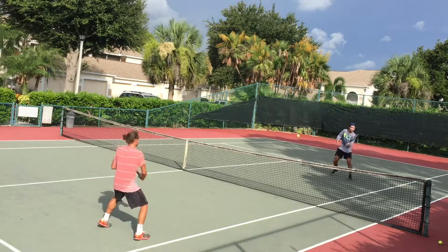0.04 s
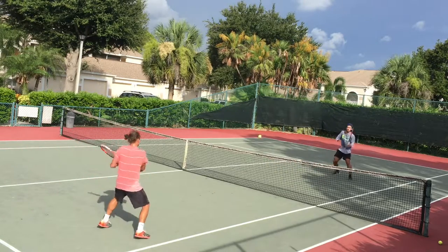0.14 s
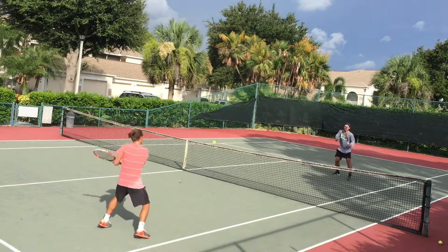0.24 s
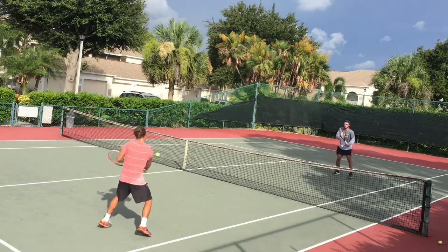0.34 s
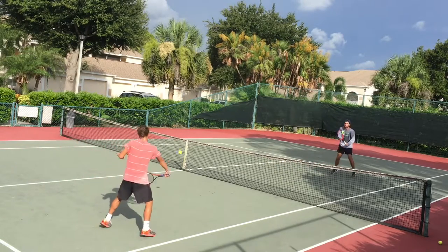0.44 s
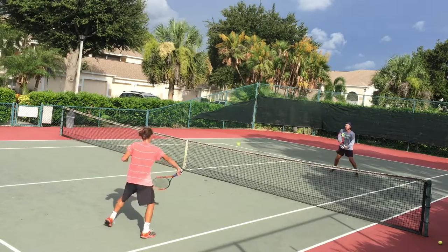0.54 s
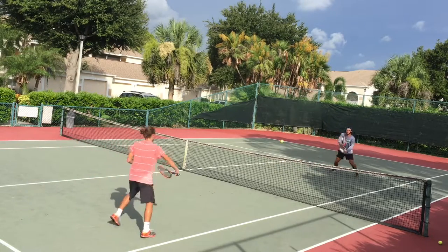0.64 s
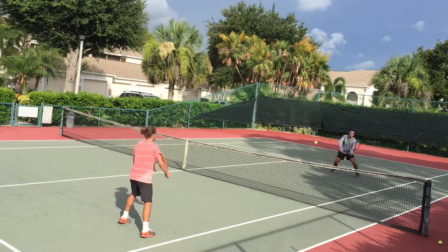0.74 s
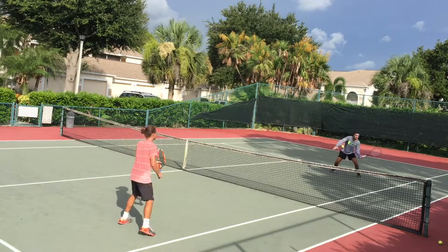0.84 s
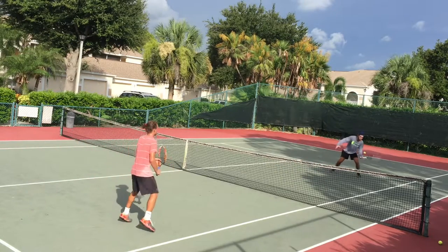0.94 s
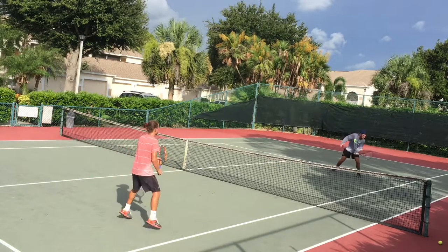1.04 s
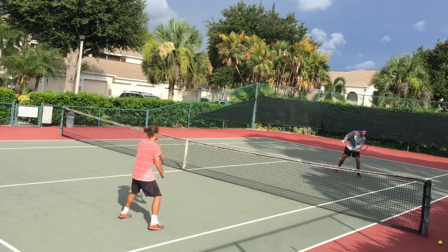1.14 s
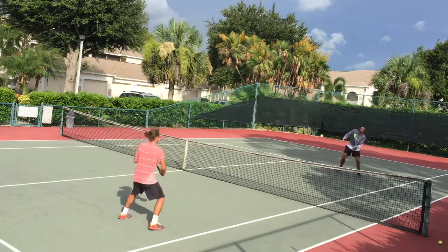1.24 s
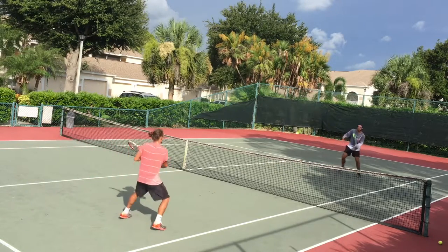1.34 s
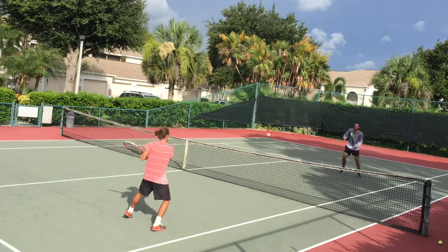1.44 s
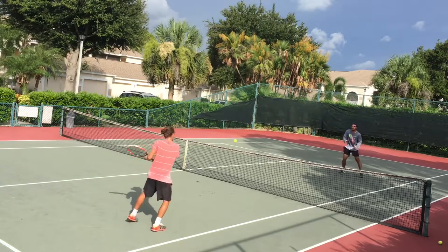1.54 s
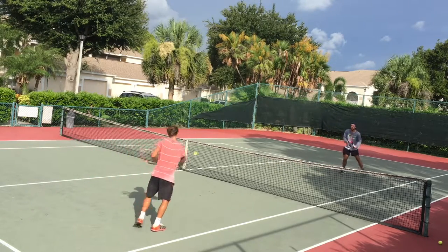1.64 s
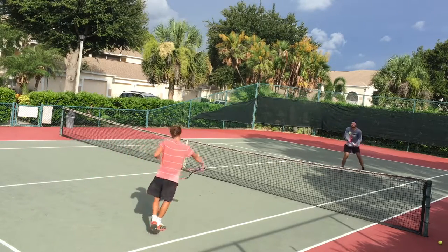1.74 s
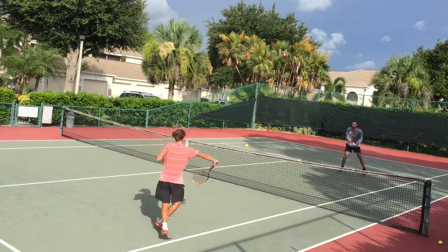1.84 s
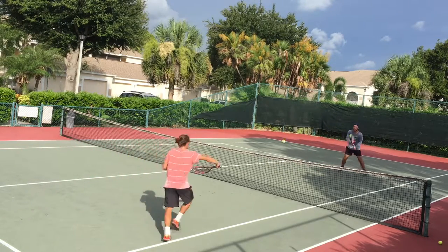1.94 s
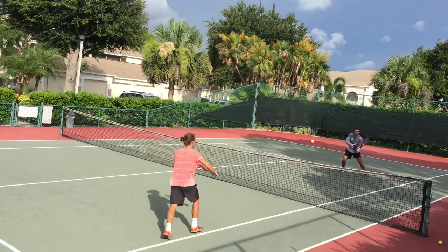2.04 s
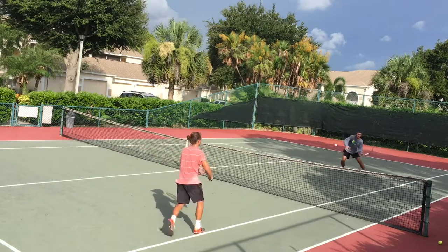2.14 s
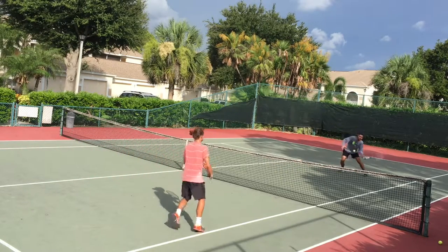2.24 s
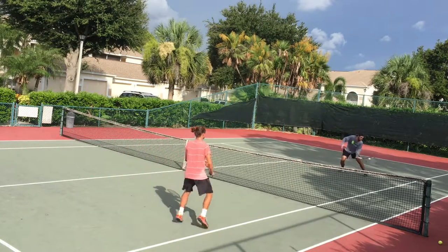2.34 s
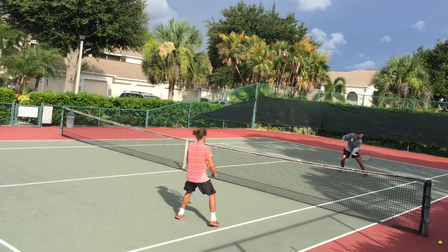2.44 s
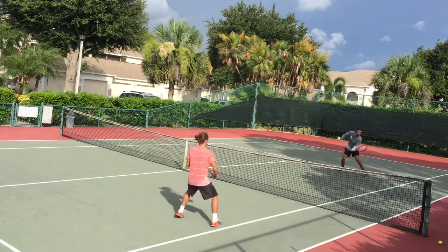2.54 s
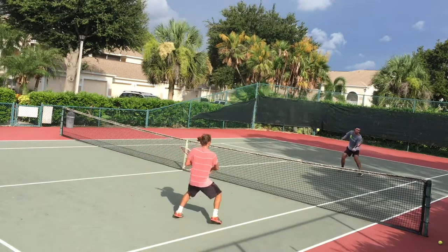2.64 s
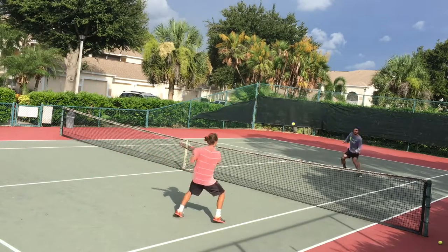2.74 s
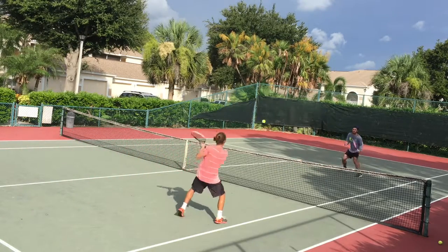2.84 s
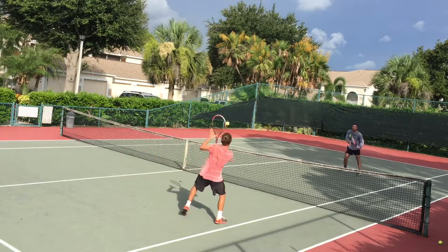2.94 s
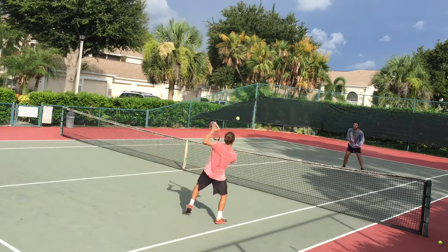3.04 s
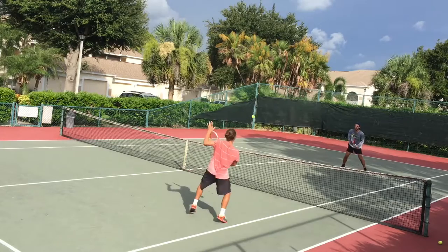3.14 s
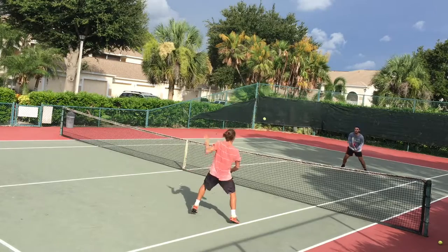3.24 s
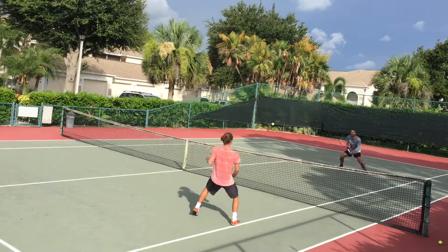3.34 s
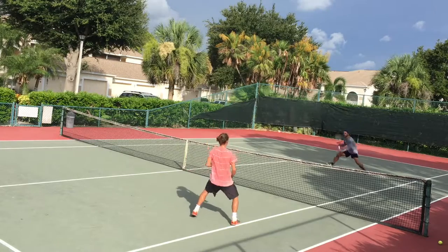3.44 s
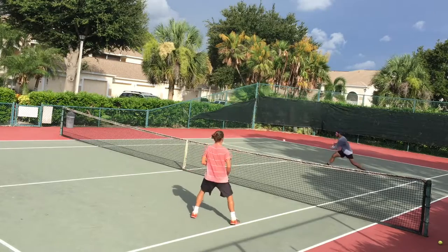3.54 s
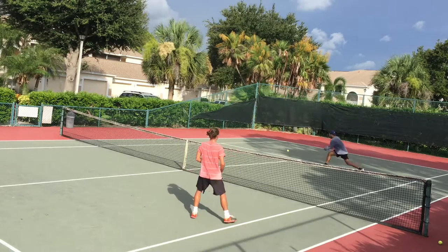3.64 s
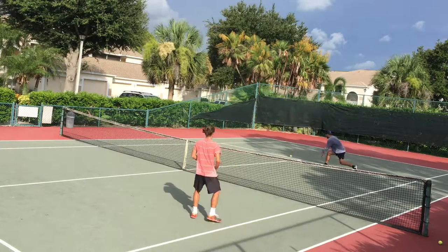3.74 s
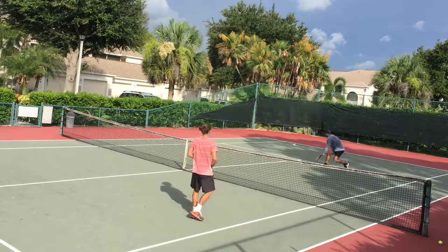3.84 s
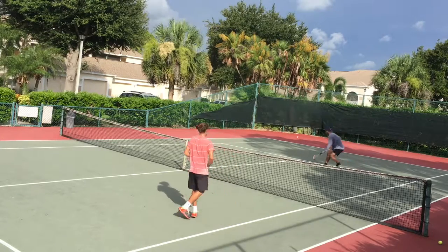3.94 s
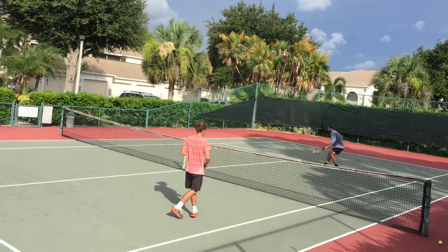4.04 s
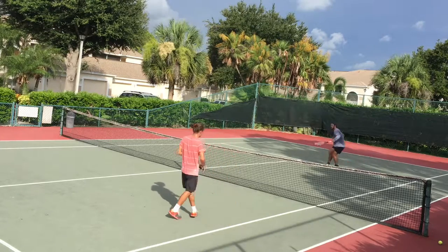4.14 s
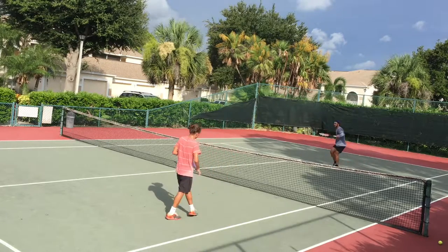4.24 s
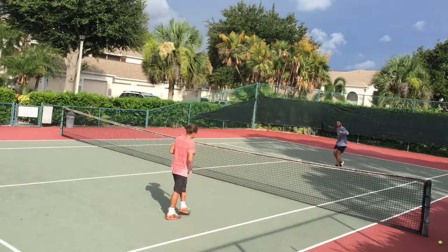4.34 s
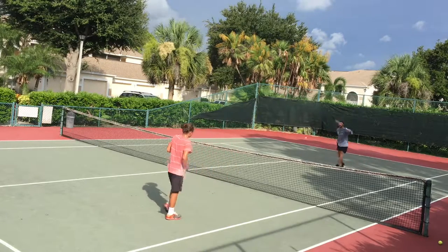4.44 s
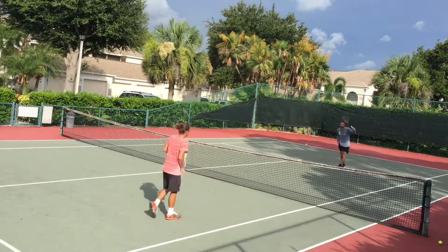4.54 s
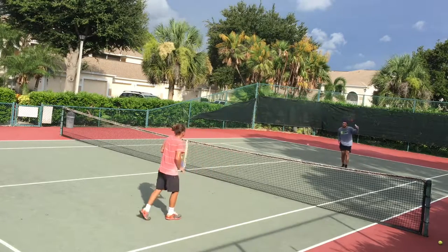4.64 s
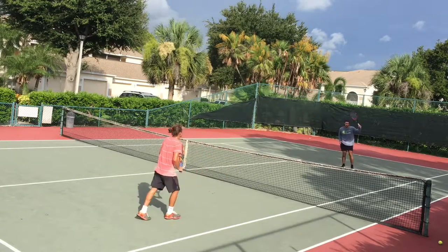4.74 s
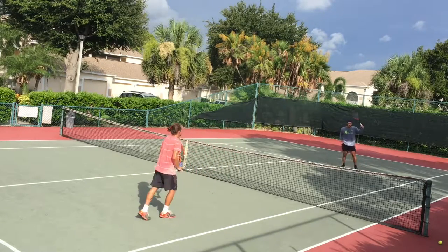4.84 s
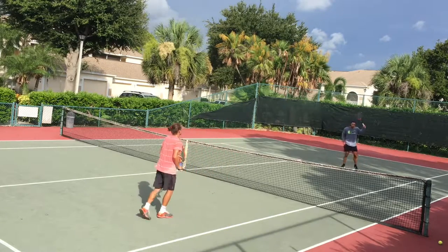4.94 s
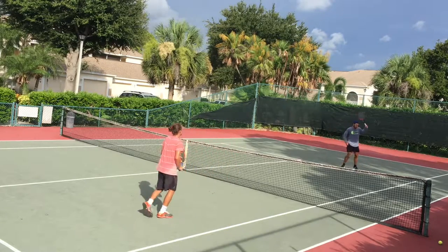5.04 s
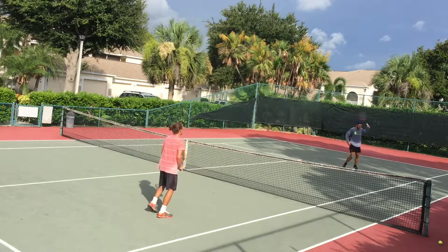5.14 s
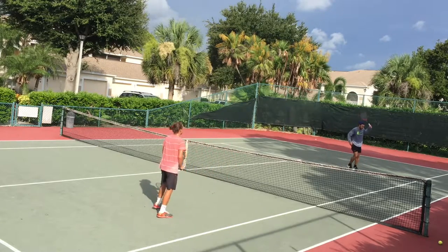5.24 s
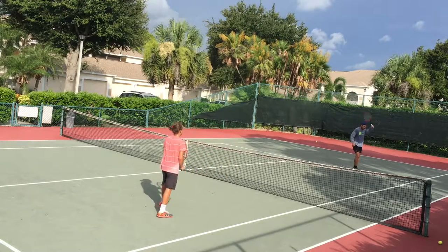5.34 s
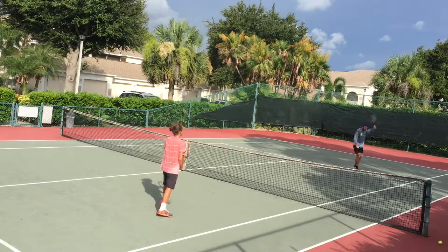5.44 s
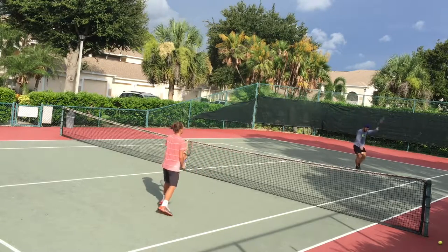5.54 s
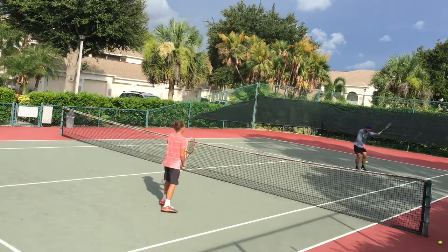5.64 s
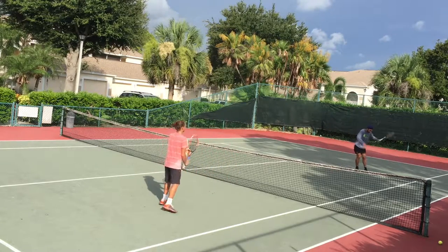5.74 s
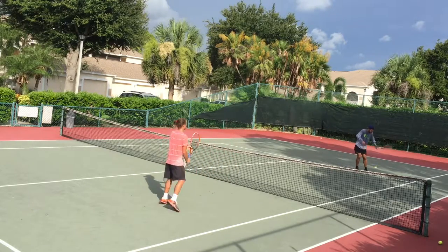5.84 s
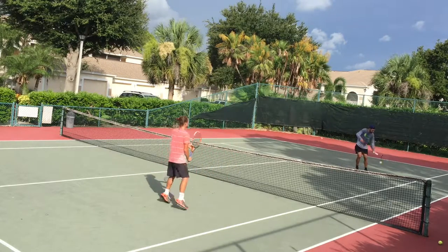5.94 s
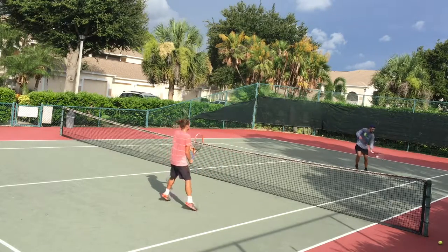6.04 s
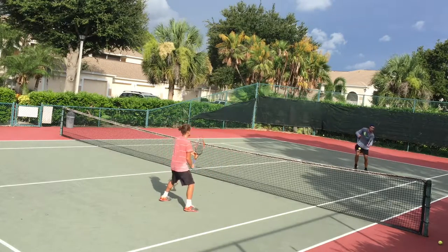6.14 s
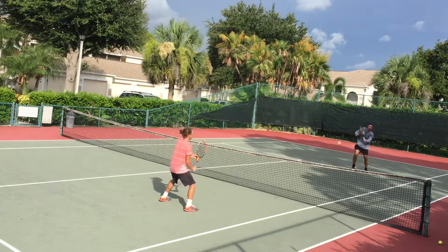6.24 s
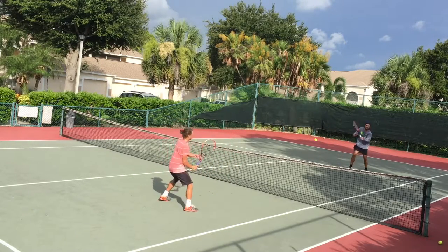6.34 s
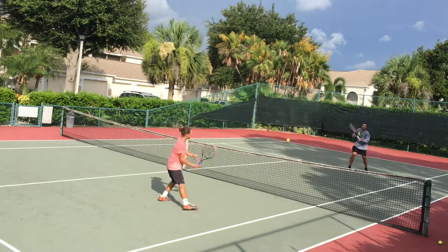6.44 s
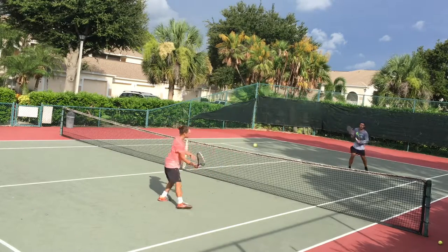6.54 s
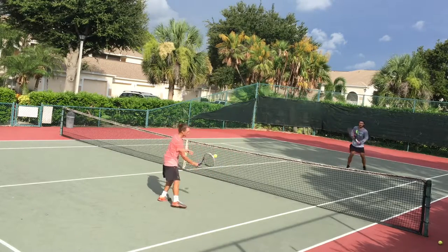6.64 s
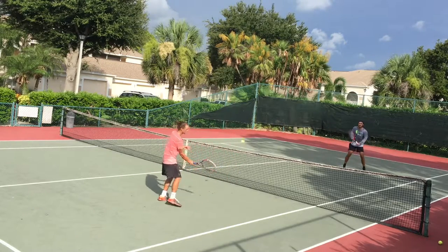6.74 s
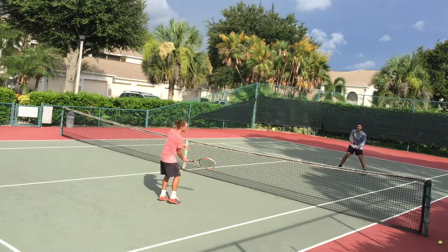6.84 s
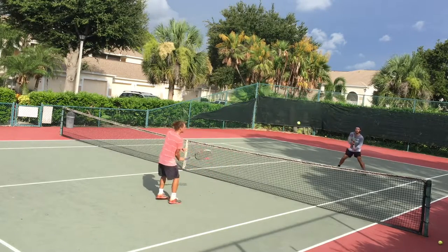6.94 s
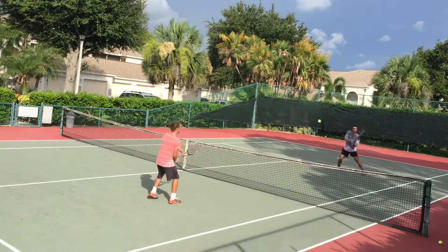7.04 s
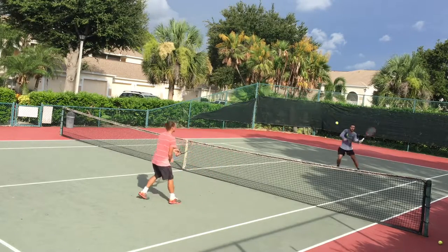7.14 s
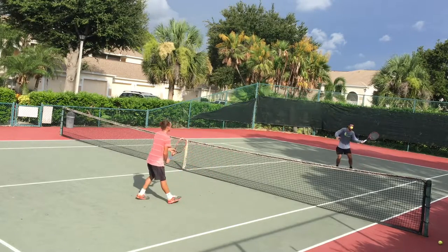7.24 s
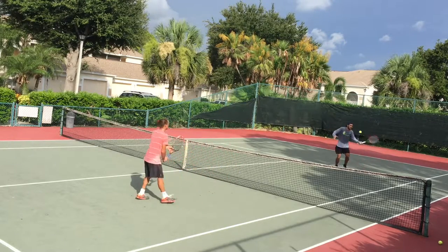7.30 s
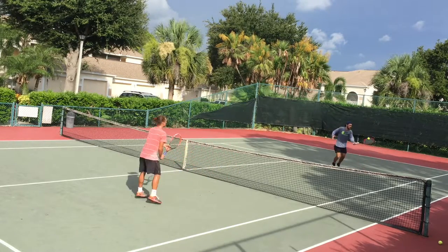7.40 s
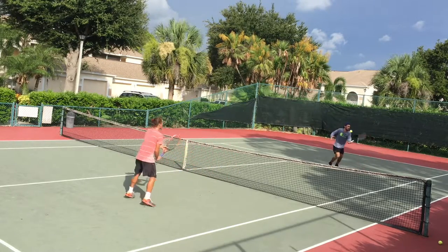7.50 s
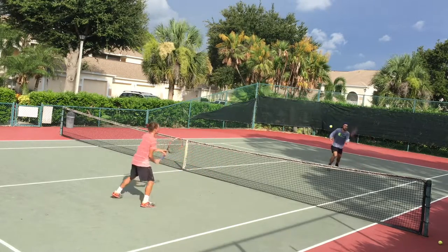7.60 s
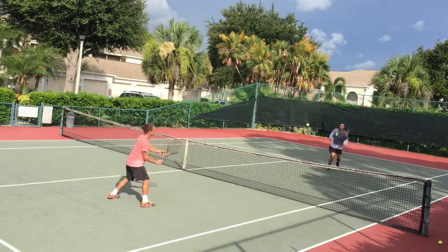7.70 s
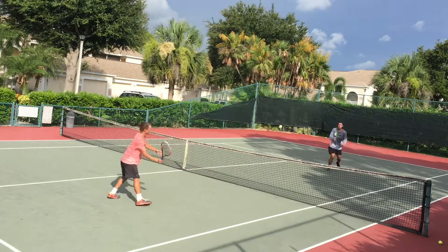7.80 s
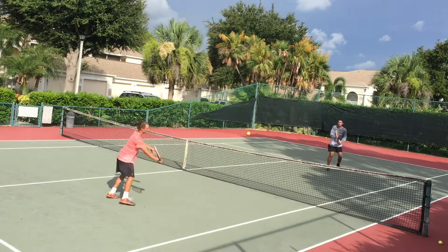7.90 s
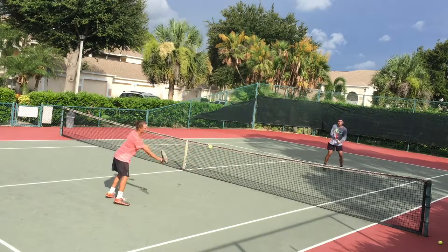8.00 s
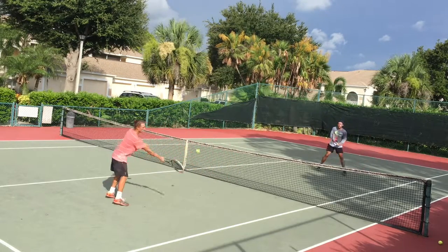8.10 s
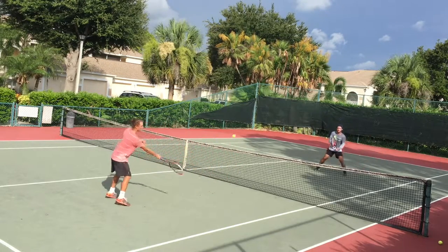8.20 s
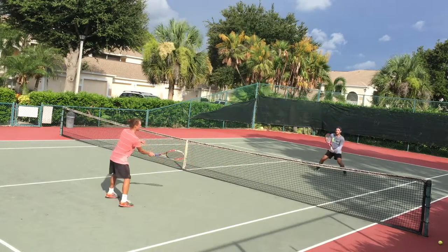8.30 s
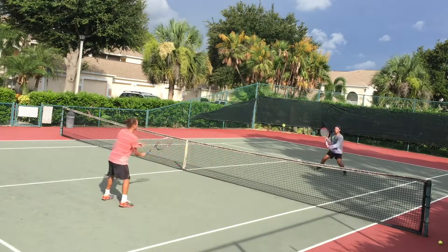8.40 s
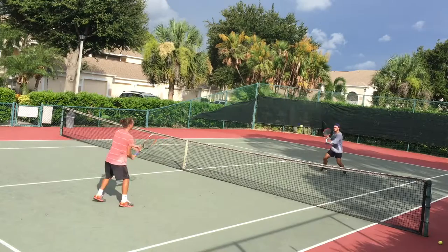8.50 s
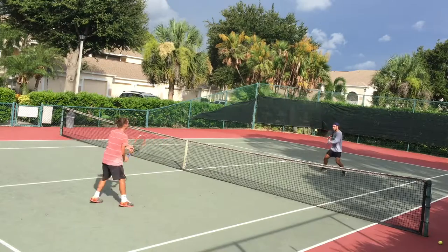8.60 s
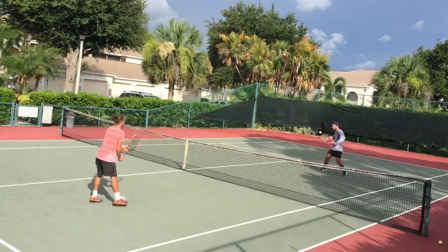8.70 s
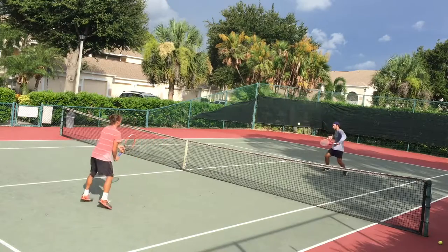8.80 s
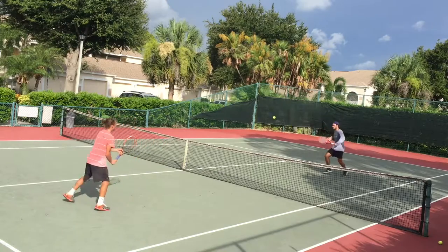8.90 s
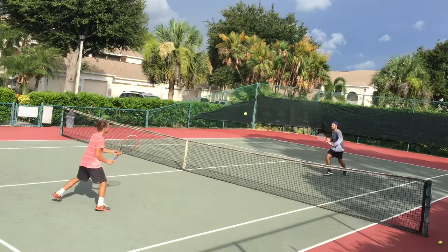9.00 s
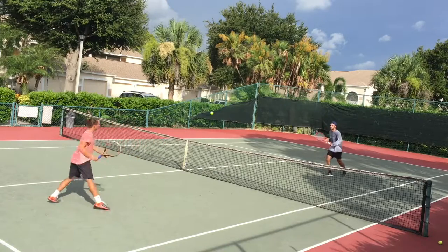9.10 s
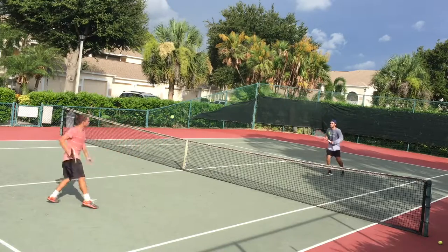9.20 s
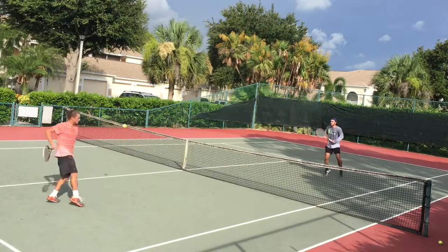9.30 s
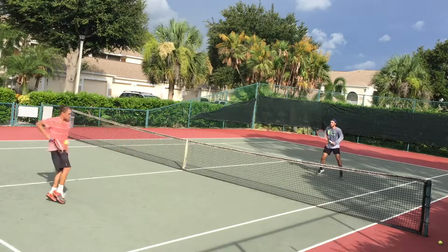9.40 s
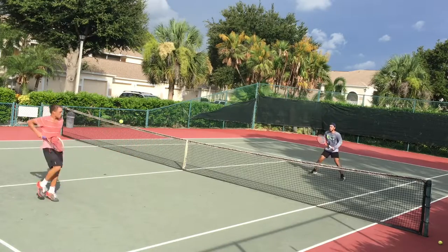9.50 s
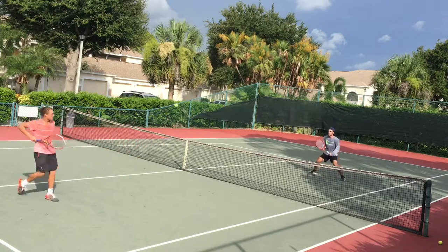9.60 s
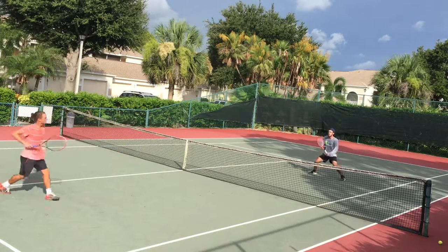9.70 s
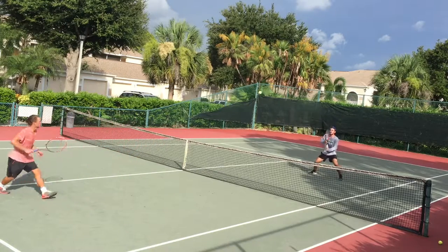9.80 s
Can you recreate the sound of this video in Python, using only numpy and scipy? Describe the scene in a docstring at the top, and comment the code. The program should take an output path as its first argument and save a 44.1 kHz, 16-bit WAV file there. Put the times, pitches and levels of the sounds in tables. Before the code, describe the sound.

A quick tennis rally outdoors, with sharp hollow racket hits, scraping and squeaking shoes and a few ball bounces.

```python
"""Rubber soles scuff and squeak over an outdoor hush: two players volley at the net of a hard tennis court.
Each stroke is a crack of strings, a push of air and the short ring of the hollow ball, doubled by the ground.
Soles rasp on grit, squeak in stick-slip and land with a dull pat; a few times the ball bounces.
Fences and houses answer faintly; distant traffic, trees and a machine hum lie underneath."""
import sys
import numpy as np
from scipy import signal
from scipy.fft import rfft, irfft, next_fast_len
from scipy.io import wavfile

SR = 44100
rng = np.random.default_rng(int(sys.argv[2]) if len(sys.argv) > 2 else 0)


def wav_out(sig):
    """Save sig, one row per channel (or a flat mono array), as 16-bit PCM at SR to the path in sys.argv[1]."""
    wavfile.write(sys.argv[1], SR, np.round(np.clip(np.atleast_2d(sig).T, -1, 1) * 32767).astype(np.int16))


N = 434826


def amp(db):
    """Decibels to gain."""
    return 10 ** (np.asarray(db) / 20)


def unit_rms(x):
    """Scales to rms 1."""
    return x / np.sqrt(np.mean(x ** 2) + 1e-20)


def curve_at(points, hz):
    """Interpolates a table on a log-frequency axis."""
    f, value = np.transpose(points)
    return np.interp(np.log(hz + 1), np.log(f + 1), value)


def add(mix, start_s, sound):
    """Mixes a sound in at start_s."""
    part = mix[max(round(start_s * SR), 0):][:len(sound)]
    part += sound[:len(part)]


def play(table, source):
    """Sounds each row of an event table at its start time."""
    track = np.zeros(N)
    for start_s, *row in table:
        add(track, start_s, source(*row))
    return track


def noise(count, gain):
    """Noise of rms 1, spectrum shaped by gain(Hz)."""
    size = next_fast_len(count + 512)
    hz = np.fft.rfftfreq(size, 1 / SR) + 1
    return unit_rms(irfft(rfft(rng.standard_normal(size)) * gain(hz), size)[:count])


def ring(t, hz, rise_s, decay_s):
    """Damped sine, soft onset at t = 0, envelope peak 1."""
    t = np.maximum(t, 0)
    envelope = (1 - np.exp(-(t / rise_s) ** 2)) * np.exp(-t / decay_s)
    return envelope / envelope.max() * np.sin(2 * np.pi * hz * t)


def resonate(x, hz, width_hz):
    """Moving resonance: shifts the curve hz to zero, smooths twice, shifts back."""
    carrier = np.exp(2j * np.pi * np.cumsum(hz) / SR)
    r = np.exp(-np.pi * width_hz / SR)
    return 2 * (carrier * signal.lfilter([(1 - r) ** 2], [1, -2 * r, r * r], x / carrier)).real


def hush(air_db=-63, hum_db=-72, hum_hz=238, hum_half_width_hz=2.8):
    """Distant traffic and air in the trees, a wavering rumble, and the hum of a far machine."""
    # Air spectrum. Each row: frequency in Hz, relative density in dB.
    spectrum = [(15, -42), (25, -16.5), (58, -2.5), (120, -9.5), (145, -12.5), (180, -9), (206, -17.5),
                (242, -11), (326, -21), (531, -24), (754, -25.5), (1480, -24.5), (1790, -27.5), (7710, -35),
                (16000, -42.5)]
    air = noise(N, lambda hz: amp(curve_at(spectrum, hz)))
    rumble = signal.sosfilt(signal.butter(1, 300, fs=SR, output="sos"), air)
    drift = noise(N, lambda hz: 1 / (1 + (hz / 5) ** 4))
    hum = noise(N, lambda hz: 1 / (1 + ((hz - hum_hz) / hum_half_width_hz) ** 2))
    return amp(air_db) * (air + 0.12 * drift * rumble) + amp(hum_db) * hum


def scuff(load_s, unload_s, db, loaded_hz, rasp_db, tilt_db_per_oct, tread_sag=.13, catch_hz=60):
    """Tiny slips hiss over the grit and shake the tread, whose resonance rises under load."""
    # Rubber on grit. Each row: frequency in Hz, relative density in dB.
    grit_spectrum = [(260, -47), (450, -14), (580, -16.5), (1040, 0.5), (1420, -5.5), (1830, 1.5),
                     (2400, -6), (3490, 0), (4840, -4), (6630, -3.5), (7690, -9), (12000, -12),
                     (15100, -14), (16000, -23.5)]
    # A flatter sole sounds lower and hollower. Each row: tread pitch in Hz, body over grit in dB.
    hollowness = [(1800, -1.5), (2300, -21.5)]
    corners_s = np.cumsum([0, load_s, unload_s])
    t = np.arange(int(corners_s[-1] * SR) + 2) / SR
    n = len(t)
    pressure = np.sin(np.interp(t, corners_s, [0, np.pi / 2, 0])) ** np.where(t < load_s, 1, 2)
    grit = noise(n, lambda hz: amp(curve_at(grit_spectrum, hz)
                                   + tilt_db_per_oct * np.log2(np.maximum(hz, 1200) / 4000)))
    wander = noise(n, lambda hz: 1 / (1 + (hz / 110) ** 4))
    tread_hz = loaded_hz * (1 - tread_sag * (1 - pressure)) * (1 + 0.1 * wander)
    friction = noise(n, lambda hz: 1 / (1 + (900 / hz) ** 4))
    rasp = unit_rms(resonate(friction, tread_hz, width_hz=0.35 * loaded_hz))
    body = noise(n, lambda hz: 1 / (1 + (1.3 * (hz / 950 - 950 / hz)) ** 2))
    rub = unit_rms(grit + amp(rasp_db) * rasp + amp(curve_at(hollowness, loaded_hz)) * body)
    slip_db = 1.7 * noise(n, lambda hz: 1 / (1 + (hz / 650) ** 2))
    # the sliding sole catches and lets go
    catch_db = noise(n, lambda hz: 1 / (1 + (hz / catch_hz) ** 4 + (15 / hz) ** 4))
    return amp(db + catch_db) * pressure * unit_rms(amp(slip_db)) * rub


def squeak(length_s, db, hz, overtone_db, wander_depth=.036, fade_db_per_s=448.5):
    """Rubber sticks and slips thousands of times a second, unsteady in pitch and strength."""
    # A weak grip sags, a firm one climbs. Each row: level in dB, glide as a share of the pitch.
    glides = [(-38, -.18), (-22, .035)]
    progress = np.linspace(0, 1, int(length_s * SR))
    wander, flutter = (noise(len(progress), lambda hz: 1 / (1 + (hz / 600) ** 4)) for _ in range(2))
    glide = np.interp(db, *np.transpose(glides))
    pitch_hz = hz * (1 + glide * (progress - .5)) * (1 + wander_depth * (wander - wander.mean()))
    phase = 2 * np.pi * np.cumsum(pitch_hz) / SR
    third_db = min(overtone_db, -6) - 12.5
    tone = np.sin(phase) + amp(overtone_db) * np.sin(2 * phase) + amp(third_db) * np.sin(3 * phase)
    level_db = db - fade_db_per_s * length_s * progress + 2.2 * flutter
    return np.sqrt(2) * amp(level_db) * tone * signal.windows.tukey(len(tone), .3)


def footfall(db):
    """A sole lands: dull push, short pat."""
    t = np.arange(SR // 8) / SR
    pat = noise(len(t), lambda hz: 1 / (1 + (hz / 850) ** 4) / (1 + (200 / hz) ** 2)) * np.exp(-t / .007)
    push = ring(t, hz=210 * rng.uniform(0.38, 1.8), rise_s=0.00049, decay_s=.004)
    return amp(db - 3.5) * (push + 0.63 * pat)


def volley(lag_s, force_db, knock_db, ball_hz, ring_db, upper_db, firm_db=-18.5):
    """Felt slaps the strings, the ball flattens and pushes air, the frame knocks, the ball rings."""
    # String bed modes. Each row: nominal frequency in Hz, relative level in dB, t60 in seconds.
    string_modes = [(706, -6, .14), (1006.7, -7, .12), (1364, -6, .12), (1680, -8, 0.15), (1920, 1, 0.091),
                    (2100, -6, 0.15), (2530, -2, .08), (2635, -10, .07), (3515, -7, 0.071)]
    t = np.arange(SR // 4) / SR
    crack_db = force_db - 15.5 + .35 * min(force_db - firm_db, 0)  # soft strokes lose extra crack
    felt = noise(len(t), lambda hz: 1 / np.sqrt((1 + (1300 / hz) ** 4) * (1 + (hz / 3300) ** 4))
                 + amp(-37))
    contact = np.minimum(t / 0.0009, 1) * (np.exp(-(t / 0.0039) ** 2) + amp(-4.5) * np.exp(-t / 0.0092))
    crack = amp(crack_db) * felt * contact
    thump_t = t - .0052  # air is drawn in, then pushed out: no net flow
    thump = amp(force_db - 2) * np.sin(2 * np.pi * 185 * thump_t) * np.exp(-(thump_t / 0.0018) ** 2)
    knock = amp(force_db + knock_db + 7.5) * ring(t - .002, hz=418, rise_s=0.00065, decay_s=0.0011)
    ball = amp(ring_db - 0.5) * ring(t - .0042, ball_hz, rise_s=0.00057, decay_s=0.004)
    upper = amp(upper_db - 2) * ring(t - .0032, ball_hz * 1.42, rise_s=0.00023, decay_s=0.0027)
    tuning = rng.uniform(0.9, 1.01)
    spots_db = rng.uniform(-0.89, 7.6, len(string_modes))  # each impact spot favours other modes
    modes = sum(amp(db + spot_db - 60 * t / t60_s) * np.sin(2 * np.pi * (hz * tuning * t + rng.random()))
                for (hz, db, t60_s), spot_db in zip(string_modes, spots_db))
    strings = amp(crack_db - 7.5) * modes * np.minimum(t / 0.001, 1)
    low_cut = signal.butter(2, 95, "highpass", fs=SR, output="sos")  # a small body radiates little bass
    direct = signal.sosfilt(low_cut, crack + thump + knock + ball + upper + strings)
    return direct + 0.59 * np.interp(t - lag_s, t, direct, left=0)  # the court mirrors the stroke


def bounce(ring_db, ball_hz, thump_db):
    """The ball hits the hard court and rings at once, with a small thump."""
    t = np.arange(SR // 10) / SR
    shell = ring(t, ball_hz, rise_s=0.00032, decay_s=.002)
    upper = amp(-8.5) * ring(t, ball_hz * 1.75, rise_s=0.00035, decay_s=0.0015)
    thump = ring(t - .002, hz=196, rise_s=0.00098, decay_s=0.0021)
    return amp(ring_db) * (shell + upper) + amp(thump_db) * thump


def surroundings(x, taps_per_s=4000, tail_db=-21):
    """Thin scatter from trees and houses, soft echo clusters from the fences."""
    # Scatter decay. Each row: frequency in Hz, t60 in seconds.
    tail_t60 = [(150, 0.9), (1000, 0.5), (3000, 0.59), (6000, 0.43), (14000, 0.5)]
    # Scatter spectrum. Each row: frequency in Hz, relative level in dB.
    tail_colour = [(100, -9), (300, 0.5), (650, -6.5), (1020, 3.5), (1400, -1.5), (1800, -1), (2450, -3),
                   (3050, -1), (4500, 1), (6200, 2), (9000, 0), (15000, -10)]
    # Fence echoes. Each row: delay in seconds, relative level in dB, decay time in seconds.
    fence_echoes = [(.035, -29.5, .014), (.06, -27, 0.011), (0.089, -27, .014), (0.168, -33, 0.022)]
    taps = rng.standard_normal(SR) * (rng.random(SR) < taps_per_s / SR)
    hz, t, bins = signal.stft(taps, SR, nperseg=256)
    shape_db = curve_at(tail_colour, hz)[:, None] - 60 * t / curve_at(tail_t60, hz)[:, None]
    response = signal.istft(bins * amp(shape_db) * np.minimum(t / .008, 1), SR, nperseg=256)[1]
    response *= amp(tail_db) / np.linalg.norm(response)
    t = np.arange(SR // 10) / SR
    for delay_s, db, decay_s in fence_echoes:
        cluster = noise(len(t), lambda hz: 1 / np.sqrt(1 + (hz / 1250) ** 8 + (350 / hz) ** 4))
        cluster *= np.exp(-t / decay_s)
        add(response, delay_s, amp(db - 14.5) * cluster / np.linalg.norm(cluster))
    return signal.fftconvolve(x, response)[:N]


def scene(ball_send_db=1, shoe_send_db=-1):
    """Shoes and ball on the court, their echoes, and the hush; mono."""
    # Soles rubbing. Each row: start, loading and unloading in seconds, level in dB, loaded tread
    # pitch in Hz, rasp over grit in dB, grit tilt in dB per octave.
    scuffs = [(0.0, 0.0026, 0.057, -28, 2960, 5.5, 1), (.038, 0.016, 0.035, -32.5, 2650, 0.5, -3),
              (.468, .008, .02, -60, 2300, -5, 5), (.54, 0.01, .046, -37, 2850, -0.5, -1),
              (.647, .046, 0.054, -53, 5100, -7, 2.5), (.886, 0.016, 0.027, -33, 2970, 11.5, 5),
              (.93, 0.06, 0.036, -53, 3200, 0, 1.5), (1.231, 0.012, 0.017, -33, 3060, 2.5, -1.5),
              (1.468, 0.012, 0.021, -48.5, 2200, 4.5, -2), (1.59, 0.027, 0.061, -53.5, 2100, -3, 2.5),
              (1.858, 0.0024, 0.029, -38.5, 3760, -4, -10), (2.0, 0.0099, 0.11, -52, 3400, -7, -2),
              (2.199, 0.0058, 0.024, -37, 1900, -15, 0), (2.548, 0.0037, 0.079, -28.5, 3060, 5.5, 0),
              (2.586, 0.03, 0.035, -30, 2800, 7.5, -3), (2.833, 0.0048, 0.034, -54.5, 3120, -9, -4),
              (2.893, 0.0017, 0.052, -31, 2474, 5.5, -2), (3.275, 0.063, 0.019, -47, 3930, -6.5, 1),
              (3.356, 0.013, .035, -35.5, 6300, 2.5, 4), (3.375, 0.019, .016, -29.5, 3100, 5, 3.5),
              (3.705, 0.02, 0.051, -55.5, 2750, 1, -0.5), (3.78, .14, 0.095, -63, 5670, 2, 3),
              (4.14, .011, 0.017, -60, 4100, 1.5, 0.5), (4.355, 0.033, .02, -56, 2570, 0, 0.5),
              (4.87, 0.023, .037, -58.5, 4150, 4, 3.5), (4.995, .044, .02, -50, 1860, 4, -3),
              (5.448, 0.0076, 0.13, -46, 1700, -5, 1), (5.56, 0.061, 0.035, -58.5, 4080, -1, 3.5),
              (5.718, 0.0072, 0.072, -46, 1787, -6, 9), (5.745, 0.032, 0.038, -44, 1970, -13, 2),
              (6.188, 0.0086, 0.048, -39.5, 3800, -6, 0.5), (6.578, 0.06, 0.15, -41.5, 2080, -27, 1),
              (6.69, 0.054, 0.3, -51, 3700, -7, 0), (6.998, 0.029, .028, -46, 2425, 0, -1.5),
              (7.25, 0.041, 0.048, -50, 2800, -4, 1.5), (7.394, 0.0054, 0.028, -50.5, 3820, -2.5, 0),
              (7.415, 0.03, 0.049, -60, 5600, 10, 6), (7.52, 0.057, .02, -55, 2100, -3, -0.5),
              (7.595, 0.043, 0.02, -45.5, 1780, -7, 8.5), (7.657, 0.0057, 0.16, -44.5, 3770, 0, 0),
              (7.71, 0.062, 0.058, -41.5, 3320, 3, -0.5), (7.83, 0.046, .06, -57, 1910, -3, -3.5),
              (7.895, .041, .018, -48.5, 2200, -17, 0), (7.998, .004, 0.25, -41.5, 6250, -7, 1.5),
              (8.37, 0.036, .021, -44.5, 3500, -2.5, .5), (8.6, 0.043, 0.069, -41.5, 2370, 5, 1.5),
              (8.65, 0.041, 0.02, -37.5, 2950, 8.5, 5), (8.941, .004, 0.074, -44.5, 6540, -14, 12),
              (8.968, 0.011, 0.11, -40, 2890, -2, 0.5), (9.274, 0.04, .14, -38, 3570, 1.5, 6),
              (9.837, 0.014, .014, -48, 2200, -17, .5)]
    # Soles gripping. Each row: start and length in seconds, level in dB, pitch in Hz,
    # second harmonic over first in dB.
    squeaks = [(.0055, 0.024, -21.5, 3044, -5), (.0548, .012, -22, 2720, -24.5),
               (.8975, 0.013, -23.5, 2913, -9), (1.2385, 0.0118, -27.5, 3240, -17),
               (2.551, 0.037, -10.5, 2948, -12), (2.618, 0.0072, -29.5, 2833, -5),
               (2.9075, 0.0033, -22, 2486, -15), (3.391, 0.0083, -25, 3346, 3.5),
               (6.219, .0087, -39, 2934, -9.5), (7.781, 0.0096, -40, 2860, -16),
               (8.401, .0081, -37.5, 3070, -13)]
    # Feet landing. Each row: start in seconds, relative level in dB.
    footfalls = [(.14, -42), (.574, -43), (.719, -39), (1.323, -35.5), (1.944, -36.5), (2.213, -30.5),
                 (2.625, -34), (2.693, -41.5), (2.915, -40), (3.402, -50), (3.452, -42.5), (8.296, -46.5),
                 (9.025, -38), (9.2, -49)]
    # Racket strokes. Each row: start and ground reflection lag in seconds, force and frame knock trim
    # in dB, ball pitch in Hz, relative levels of ring and upper ring in dB.
    volleys = [(0.5255, 0.0014, -17, -7.5, 915, -16, -32.5), (1.1475, 0.00081, -22.5, 0, 1076, -19.5, -22),
               (1.8435, .0013, -17, -11, 940, -18.5, -26), (2.5215, 0.00051, -24, -3.5, 960, -16.5, -24),
               (3.104, .0028, -20.5, -9, 870, -20, -20.5), (3.7325, 0.00052, -25.5, -10.5, 748, -32.5, -26),
               (4.7215, 0.00093, -44.5, -8, 794.7, -53.5, -67),
               (6.1742, 0.0006, -35, -5, 700, -38.5, -37.5), (6.806, 0.001446, -20, -10.5, 972, -22, -28.5),
               (7.569, 0.00098, -25.5, -4, 1098, -18.5, -28.5),
               (8.2232, 0.0014, -19.5, -8, 962, -20, -25.5), (8.854, .00093, -23, -11.5, 1070, -19, -47.5),
               (9.568, 0.00151, -21, -6.5, 1088, -24, -25.5)]
    # Ball on the court. Each row: start in seconds, ring in dB, ball pitch in Hz, thump in dB.
    bounces = [(3.8933, -30.5, 1086, -38), (4.7797, -42.5, 1074, -41.5), (5.9236, -37.5, 1165, -40.5),
               (9.8226, -36.5, 1260, -54)]
    ball = play(volleys, volley) + play(bounces, bounce)
    shoes = play(footfalls, footfall) + play(scuffs, scuff) + play(squeaks, squeak)
    # the ball, high in the air, reaches the fences better than the shoes
    echoes = surroundings(amp(ball_send_db) * ball + amp(shoe_send_db) * shoes)
    return (shoes + ball + echoes + hush())[None]


def record(dry, low_cut_hz=35, band_limit_hz=16150):
    """A small microphone sheds deep bass; a steep low-pass limits the band."""
    thin = signal.sosfilt(signal.butter(2, low_cut_hz, "highpass", fs=SR, output="sos"), dry)
    low_pass = signal.firwin(511, band_limit_hz, window=("kaiser", 9), fs=SR)
    return signal.oaconvolve(thin, low_pass[None], "same")


dry = scene()
out = record(dry)
wav_out(out)
```